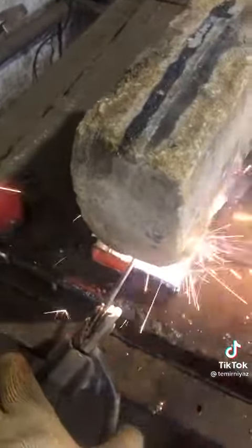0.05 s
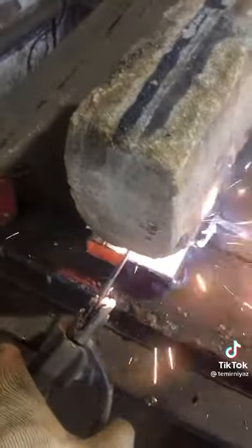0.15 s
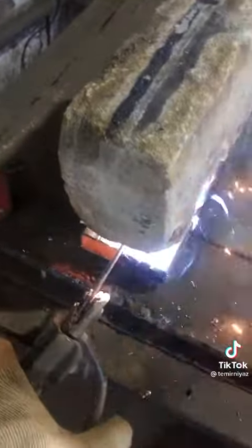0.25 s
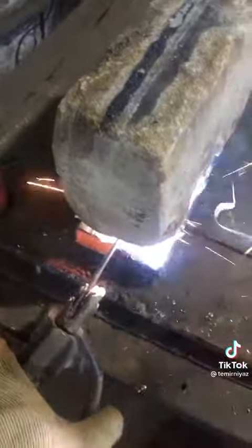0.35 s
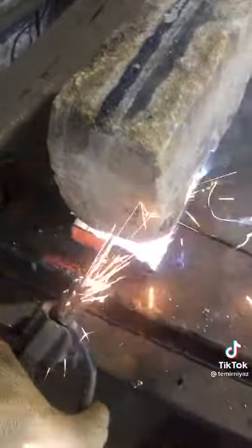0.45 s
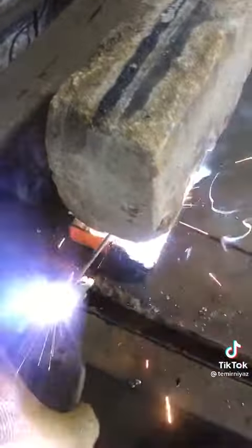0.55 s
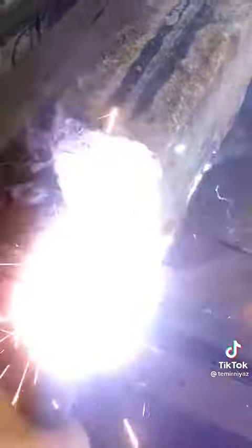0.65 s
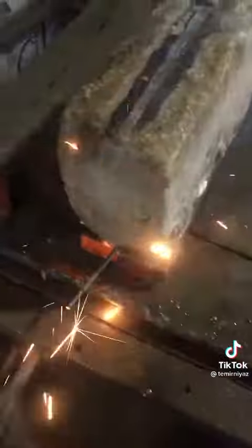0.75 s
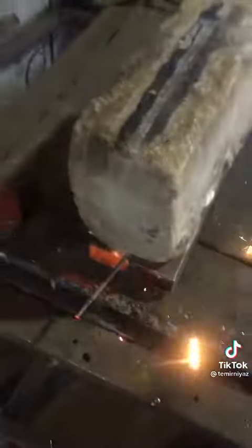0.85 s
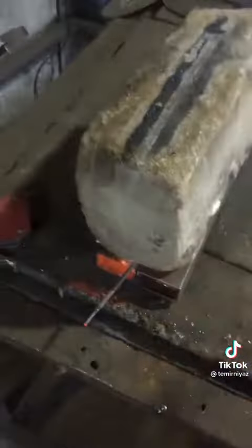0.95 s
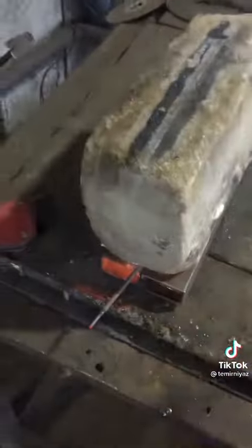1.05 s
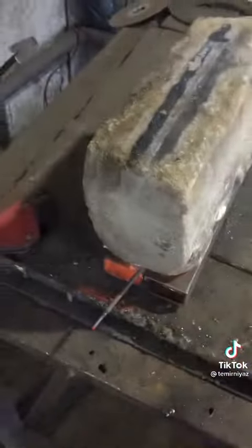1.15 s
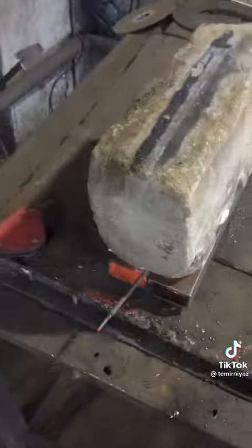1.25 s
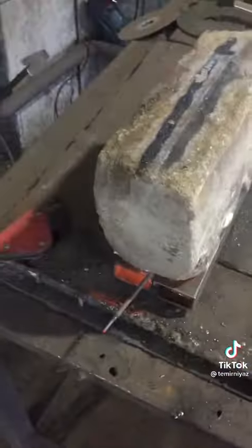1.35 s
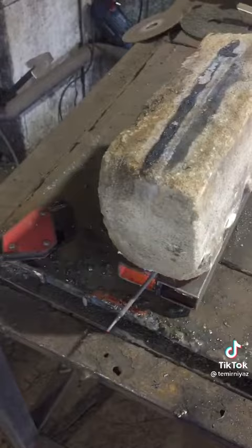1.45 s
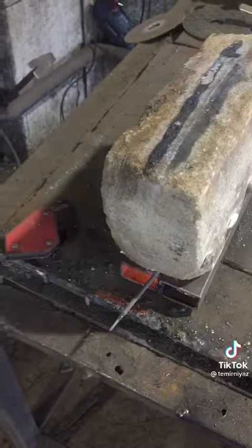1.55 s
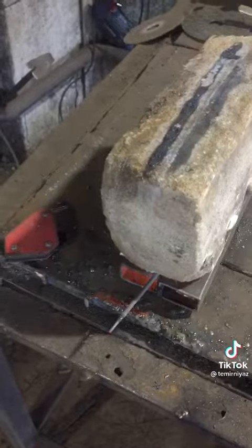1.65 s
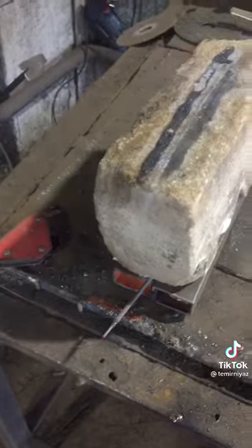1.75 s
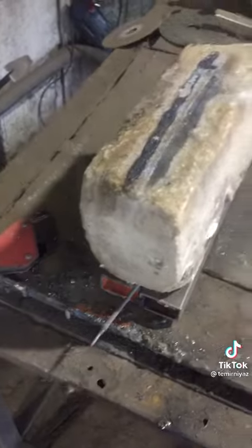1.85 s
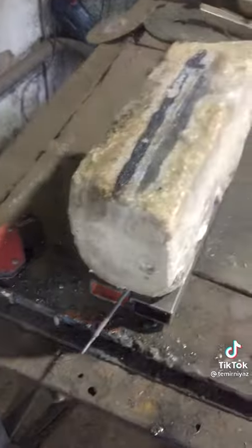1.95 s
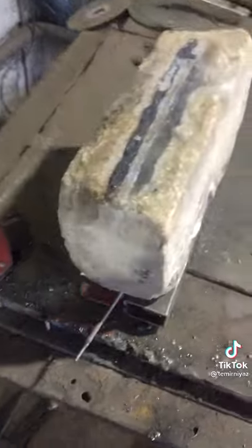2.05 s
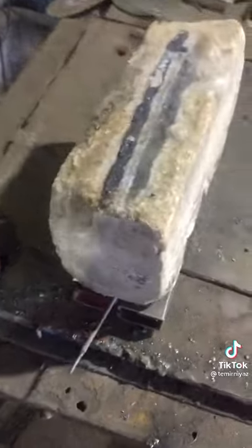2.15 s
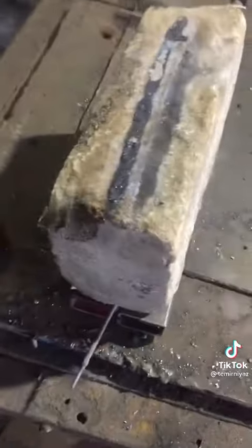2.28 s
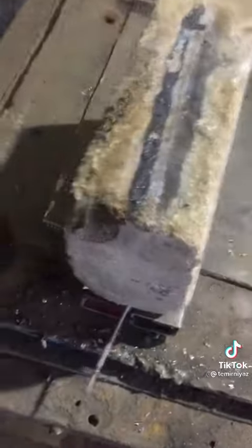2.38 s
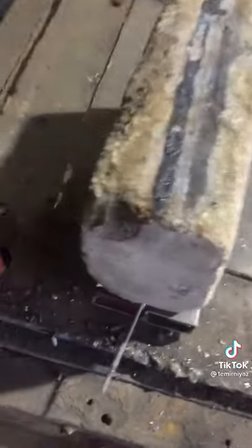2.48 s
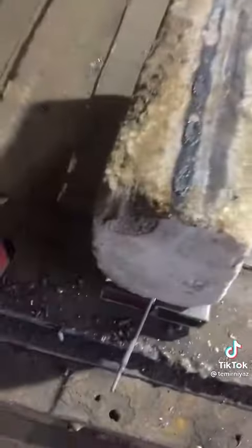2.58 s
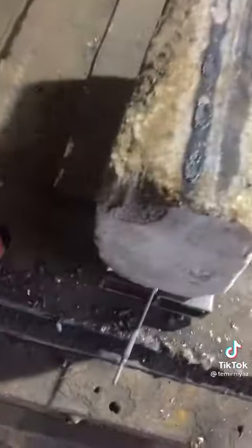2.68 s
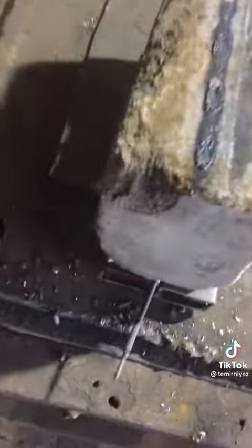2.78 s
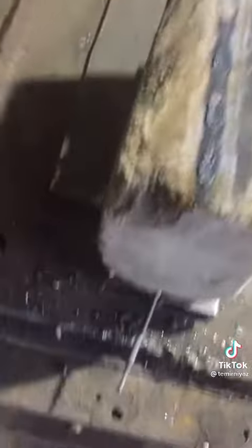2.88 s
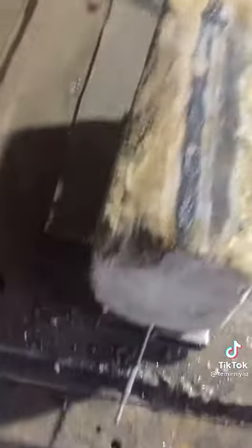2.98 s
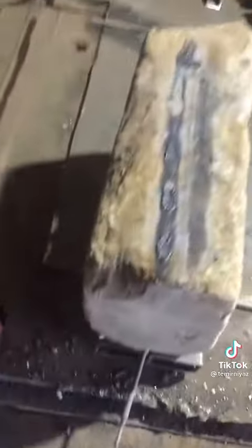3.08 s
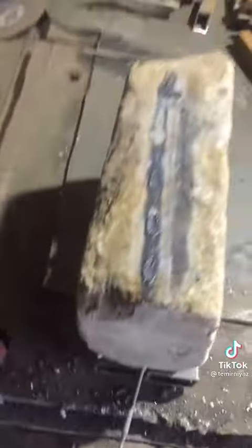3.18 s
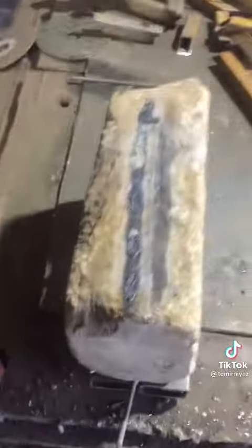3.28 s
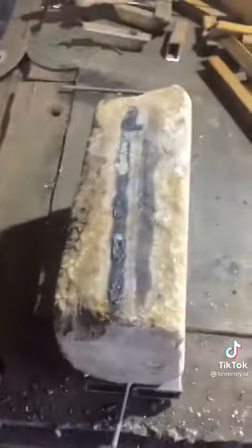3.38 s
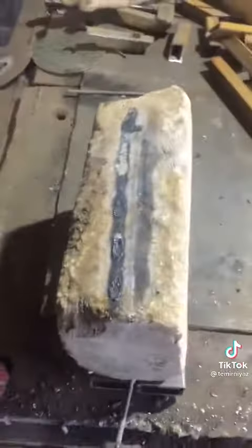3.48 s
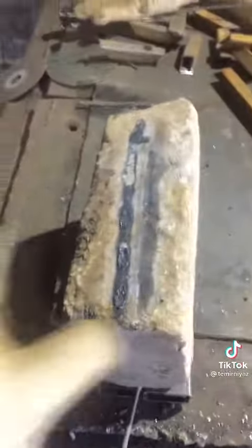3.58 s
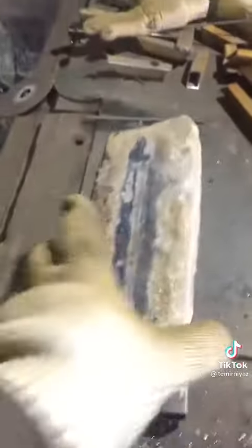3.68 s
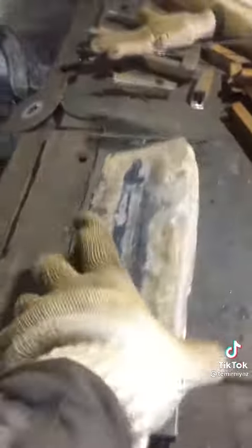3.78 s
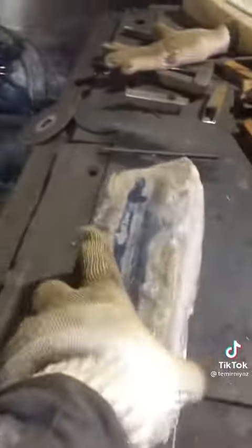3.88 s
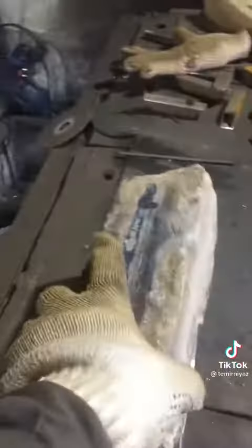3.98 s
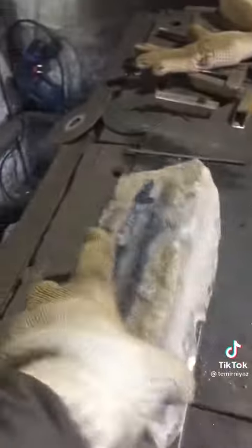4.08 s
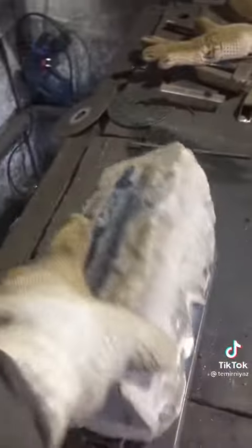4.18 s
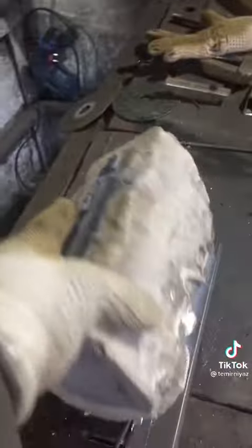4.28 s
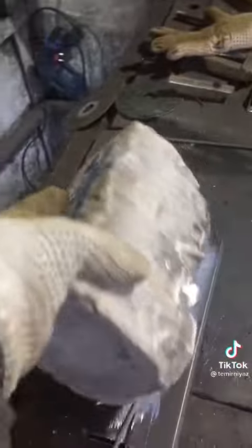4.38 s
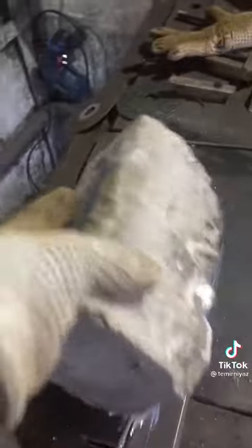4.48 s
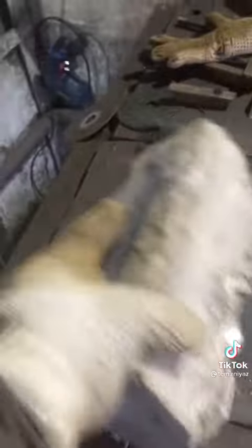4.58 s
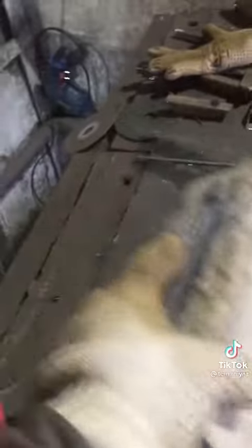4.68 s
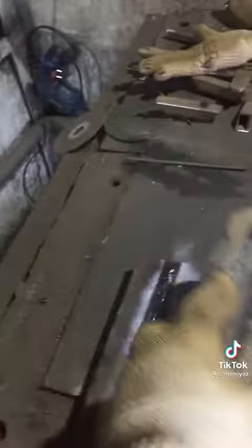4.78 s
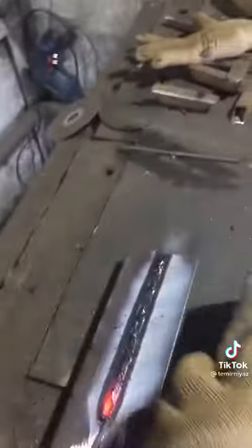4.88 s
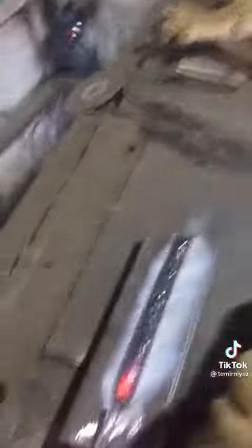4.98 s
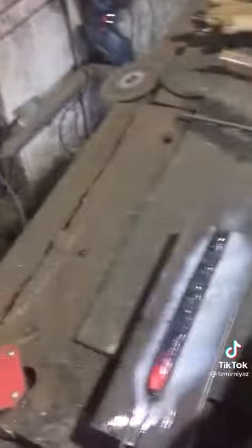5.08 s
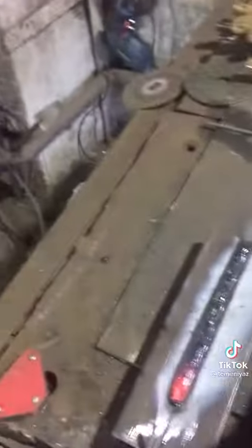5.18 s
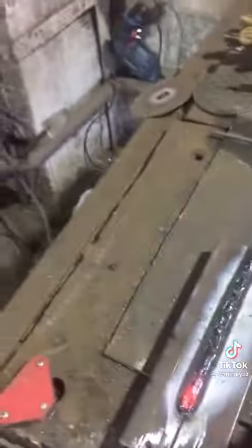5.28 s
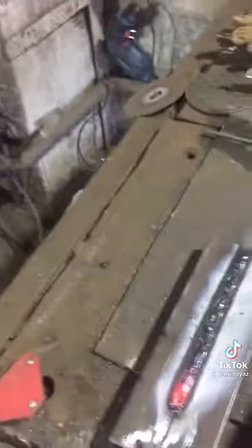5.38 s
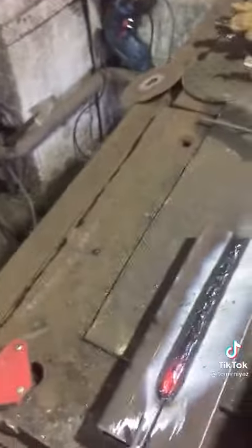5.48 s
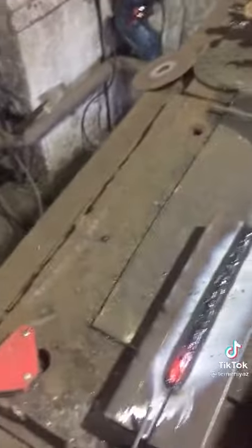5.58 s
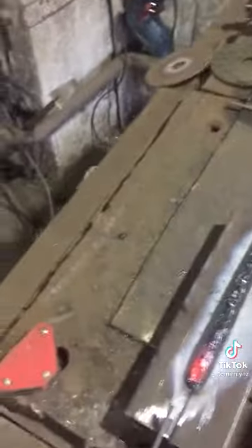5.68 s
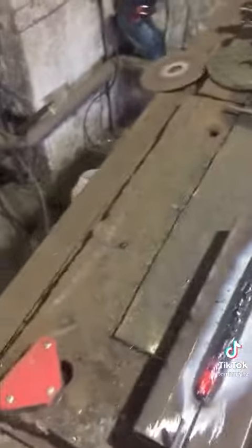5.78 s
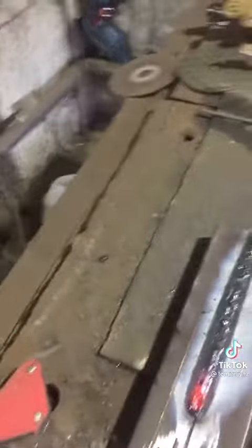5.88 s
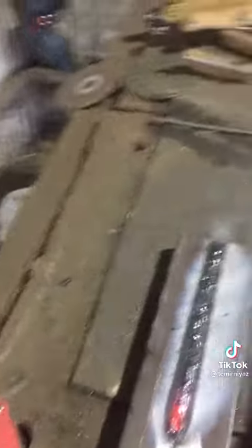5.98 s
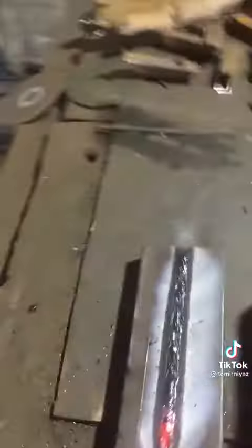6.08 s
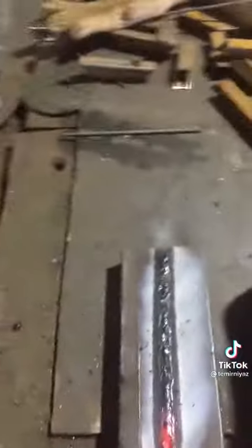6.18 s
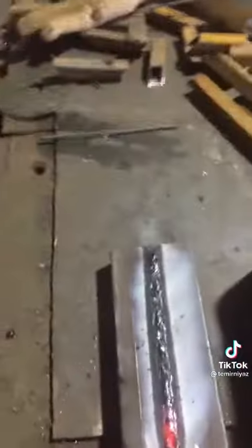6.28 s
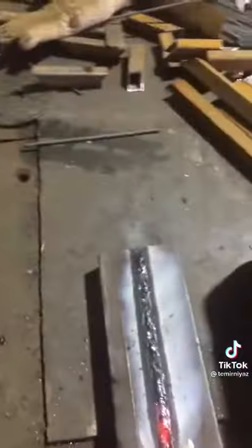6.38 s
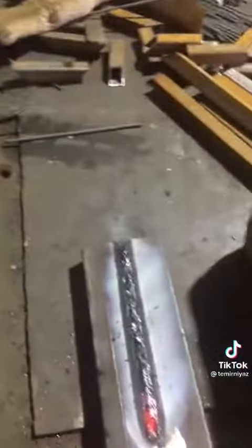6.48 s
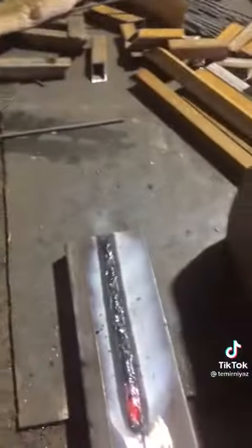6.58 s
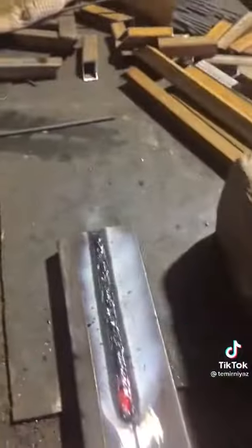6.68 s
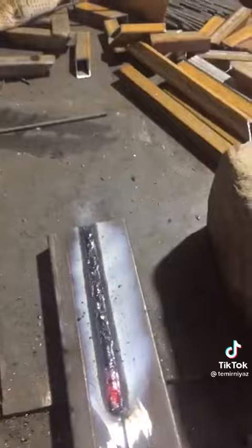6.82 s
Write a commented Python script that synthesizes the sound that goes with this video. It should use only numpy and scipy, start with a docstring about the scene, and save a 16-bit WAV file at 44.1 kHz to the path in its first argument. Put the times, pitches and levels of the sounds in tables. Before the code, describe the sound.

A handheld microphone near a steel workbench catches the loud, bright, crackling end of a weld, which flares and stops. Thin sizzling and brittle ticking fade over the next second, with two metallic knocks. Behind them a machine fan whines evenly over workshop rumble. Sharp clatter comes midway, then gloved scuffing, a loud low thud with metal rattle and short room echo, and finally small clicks and one dull knock.

```python
"""A stick-welding arc hisses and spits under a block in a hard-walled workshop and goes out; the slag sizzles and ticks.
Holder and block are set down on a steel bench, a glove scuffs about, and the welder's fan whines over the shop's hum.
Arc, slag and glove are shaped noise and grains; spits, ticks and knocks are four-band noise bursts; the bench adds
ringing modes, noise dies through single resonances, the fan is a set of sine orders. A diffuse tail adds the walls."""
import sys
import numpy as np
from scipy import signal
from scipy.fft import rfft, irfft
from scipy.io import wavfile
from scipy.ndimage import uniform_filter1d

SR = 44100
rng = np.random.default_rng(int(sys.argv[2]) if len(sys.argv) > 2 else 0)


def log_audio(samples):
    """Write samples as a 16-bit WAV file to the path given in sys.argv[1]."""
    # one column per channel
    frames = np.atleast_2d(samples).T
    # limit to full scale, then quantise
    limited = np.clip(frames, -1, 1)
    pcm = np.round(limited * 32767).astype(np.int16)
    wavfile.write(sys.argv[1], SR, pcm)


N = 302084
T = np.arange(N) / SR
HZ = np.maximum(np.fft.rfftfreq(N, 1 / SR), 1)
BURST_N = 8192  # samples in one blow or rattle


def undb(db):
    """Amplitude gain from dB."""
    return 10 ** (np.asarray(db) / 20)


def unit(x):
    """Scale to RMS 1."""
    return x / np.sqrt(np.mean(x ** 2))


def colour(x, points):
    """Shape the spectrum by (f/Hz, gain/dB) points, joined on a log-frequency axis."""
    f_hz, gain_db = np.transpose(points)
    gain = undb(np.interp(np.log(HZ), np.log(f_hz), gain_db))
    return irfft(rfft(x) * gain, N)


def curve(t_s, level_db):
    """Gain from a dB curve, silent outside it."""
    return undb(np.interp(T, t_s, level_db, left=-200, right=-200))


def band(x, lo_hz, hi_hz):
    """Butterworth band-pass."""
    return signal.sosfilt(signal.butter(2, [lo_hz, hi_hz], "bandpass", fs=SR, output="sos"), x)


def resonate(x, peaks):
    """Sum of (f/Hz, width/Hz, level/dB) resonances."""
    return sum(undb(db) * signal.lfilter(*signal.iirpeak(hz, hz / width, SR), x) for hz, width, db in peaks)


def ring(x, modes):
    """Sum of (f/Hz, level/dB, t60/s) decaying modes, each a one-pole complex resonator."""
    out = 0
    for f_hz, level_db, t60_s in modes:
        pole = np.exp(2j * np.pi * f_hz / SR - np.log(1000) / (t60_s * SR))
        out = out + undb(level_db) * signal.lfilter([1], [1, -pole], x).imag
    return out


def walk(rate_hz):
    """Random levels held 1 / rate_hz s, smoothed twice over that span, RMS 1."""
    hold = int(SR / rate_hz)
    steps = np.repeat(rng.standard_normal(N // hold + 1), hold)
    return unit(uniform_filter1d(uniform_filter1d(steps, hold), hold)[:N])


def grains(rate_hz, spread_db):
    """Sparse random clicks of either sign, few of them large, RMS 1."""
    chance = rng.random(N)
    size = np.minimum(rng.exponential(size=N), 4)
    sign = rng.choice([-1, 1], N)
    return unit((chance < rate_hz / SR) * sign * undb(spread_db * size))


def scattered(start_s, stop_s, level_db, spread_db, count):
    """Random moments and levels from level_db up, few of them strong."""
    u = rng.random((count, 2)).T
    return start_s + (stop_s - start_s) * u[0], level_db - spread_db * np.log(1 - u[1])


def swell(centre_s, length_s):
    """Raised-cosine hump."""
    out = np.zeros(N)
    near = slice(max(int((centre_s - length_s / 2) * SR), 0), int((centre_s + length_s / 2) * SR))
    out[near] = np.cos(np.pi * (T[near] - centre_s) / length_s) ** 2
    return out


def blows(t_s, level_db, tone_db, t60_s, scatter_db, snap):
    """Each blow is a snap and a dying burst of noise in four bands; the bass lasts longer, the treble shorter.

    tone_db: under 800 Hz, 800-3000 Hz, over 8 kHz, against 3-8 kHz; t60_s holds for 3-8 kHz."""
    edges_hz = [(70, 800), (800, 3000), (3000, 8000), (8000, 16500)]
    lasting = np.array([[1.8], [1.2], [1.0], [.7]])  # t60 ratio per band
    drive, t = np.zeros((4, N + BURST_N)), T[:BURST_N]
    tone_db = np.insert(np.broadcast_to(tone_db, (len(t_s), 3)), 2, 0, axis=1)
    for at_s, blow_db, own_db, long_s in zip(t_s, level_db, tone_db, np.broadcast_to(t60_s, len(t_s))):
        long_s = max(long_s, .002)
        decay = 1000. ** (-t / (lasting * long_s))
        attack = 1 - np.exp(-(t + 1 / SR) / (.02 * long_s))
        burst = rng.standard_normal(BURST_N) * decay * attack
        burst[:, 0] += snap
        gain = undb(blow_db + own_db + scatter_db * rng.standard_normal(4))
        start = int(at_s * SR)
        drive[:, start:start + BURST_N] += gain[:, None] * burst
    out = 0
    for k, (lo_hz, hi_hz) in enumerate(edges_hz):
        equal_power = np.sqrt(5000 / (hi_hz - lo_hz))
        out = out + (-1) ** k * equal_power * band(drive[k, :N], lo_hz, hi_hz)  # sign keeps neighbours in phase
    return out


def arc():
    """Plasma hiss with fine crackle and bursting droplets rings the gap under the block; roar, flares and puffs add."""
    # burning arc, hiss: (t/s, level/dB)
    burn_curve = [(0.0, -21), (0.02, -26), (0.045, -29), (.25, -29.5), (.275, -33), (.29, -27), (.42, -27),
                  (.6, -29.5), (0.645, -30), (0.657, -23), (0.724, -23.5), (0.77, -32.5)]
    # hiss spectrum: (f/Hz, gain/dB)
    hiss_colour = [(35, -52), (60, -13), (308, -7.5), (480, -12.5), (621, -1), (2000, -3.5), (3270, 0),
                   (3940, -2.5), (4220, 0.5), (7750, -1), (9570, -1), (14600, -15.5), (16000, -6)]
    # air gap under the block: (f/Hz, width/Hz, level/dB)
    gap_peaks = [(2930, 110, -3.5), (3264, 60, 8), (4100, 67, -13)]
    # single bursting droplets: (t/s, level/dB)
    timed_spits = [(0.0014, -18), (0.0176, 0), (0.0425, -9), (0.0566, -6.5), (0.1554, -12), (0.1765, -14),
                   (0.187, -2), (0.2389, -8), (0.2515, -5.5), (0.2876, -18.5), (0.4061, -10), (0.43, -13.5),
                   (.498, -15), (0.517, -11.5), (0.534, -11), (0.6177, -14.5), (0.656, 0), (0.6631, -4.5),
                   (0.699, -18.5), (0.7073, -39), (0.7203, -20.5), (0.7383, -9.5)]
    # spit tone at 0 dB level: (under 800 Hz, 800-3000 Hz, over 8 kHz)/dB against 3-8 kHz
    spit_tone_db = (-8.5, -9, 0)
    # arc drawn long, hissing high: (start t/s, level/dB, length/s)
    flare_times = [(.53, -22, .013), (0.658, -22.5, 0.041), (0.702, -21.5, .058)]
    # flare resonances: (f/Hz, width/Hz, level/dB)
    flare_peaks = [(12150, 3100, 3.5), (14600, 1900, -9.5)]
    # gas pushed out as the arc flares or dies: (start t/s, level/dB before the band-pass, length/s)
    puff_times = [(.018, -14, 0.0043), (0.662, -20, 0.0028), (0.694, -25, 0.0035), (0.755, -20, 0.0048)]
    bass_db_per_db = 3  # the bigger the droplet, the fuller its burst
    roar_db, roar_waver_db = -18.5, 2.5  # against the hiss
    flare_edge_s, flare_flicker_db = .006, 2

    burning = curve(*np.transpose(burn_curve))
    flutter = undb(2.2 * walk(110))
    plasma = flutter * (rng.standard_normal(N) + 1.1 * grains(600, spread_db=3))

    random_spits = scattered(0, burn_curve[-2][0], -26.5, spread_db=2.5, count=45)
    t_s, level_db = np.hstack([np.transpose(timed_spits), random_spits])
    tone_db = spit_tone_db + bass_db_per_db * np.outer(level_db, [1, .5, 0])
    spits = blows(t_s, level_db, tone_db, t60_s=.0055, scatter_db=1.0, snap=3.56)
    hiss = burning * unit(colour(plasma, hiss_colour)) + spits

    roar_gain = burning * undb(roar_db + roar_waver_db * walk(15))
    roar = roar_gain * unit(band(rng.standard_normal(N), 92.6, 1100))

    drawn = 0
    for start_s, flare_db, length_s in flare_times:
        edge = np.minimum(T - start_s, start_s + length_s - T) / flare_edge_s
        drawn = drawn + undb(flare_db) * np.clip(edge, 0, 1)
    flicker = undb(flare_flicker_db * walk(45))
    flares = drawn * flicker * unit(resonate(resonate(plasma, flare_peaks), flare_peaks))

    pushes = sum(undb(db) * swell(start_s + length_s / 2, length_s) for start_s, db, length_s in puff_times)
    puffs = band(pushes, 50, 900)
    return hiss + undb(1.0) * resonate(hiss, gap_peaks) + roar + flares + puffs


def fan():
    """Sine orders of the blade rate, which drifts slightly; each order wavers alone."""
    # orders 4 and 5 as the listener moves about: (t/s, 4th level/dB, 5th level/dB)
    moving_orders = [(.8, -55, -56), (1.3, -47.5, -67), (1.5, -45, -66), (1.9, -43.5, -55.5),
                     (2.4, -47.5, -56), (2.8, -43.5, -53), (3.1, -47, -52), (3.5, -44.5, -57),
                     (4.1, -42.5, -55.5), (4.5, -51, -51), (4.85, -56, -49.5), (5.4, -44.5, -60),
                     (5.8, -44.5, -57.5), (6.1, -52, -57), (6.45, -43.5, -66), (6.85, -48.5, -67)]
    # steady orders: (order, level/dB)
    steady_orders = [(2, -59), (3, -60.5), (6, -55), (7, -63), (9, -70.5), (11, -71.5), (12, -73.5)]
    # first order, stronger nearer the fan: (t/s, level/dB)
    first_order = [(0, -72), (1.9, -59), (3.5, -52.5), (6.85, -49)]
    blade_hz = 473.7

    t_s, fourth_db, fifth_db = np.transpose(moving_orders)
    phase = 2 * np.pi * np.cumsum(blade_hz * (1 + .0008 * walk(2))) / SR
    gains = [(1, curve(*np.transpose(first_order)))]
    gains += [(4, undb(np.interp(T, t_s, fourth_db))), (5, undb(np.interp(T, t_s, fifth_db)))]
    gains += [(order, undb(db)) for order, db in steady_orders]
    out = 0
    for order, gain in gains:
        waver = undb(1.4 * walk(8))
        tone = np.sqrt(2) * np.sin(order * phase + 2 * np.pi * rng.random())  # RMS 1
        out = out + gain * waver * tone
    return out


def shop():
    """Fan air and far machines: steady noise with humps that swell alone, over a rumble that comes and goes."""
    # air spectrum: (f/Hz, gain/dB)
    air_colour = [(26, -45.5), (45, 0.5), (215, -6), (279, -6), (405, -0.5), (477, -12), (631, -8),
                  (918, -10), (1430, -9.5), (1680, -11.5), (1940, -6), (2080, -9.5), (2880, -12),
                  (3560, -17), (12000, -40.5), (15600, -75.5), (22000, -120)]
    # swelling humps: (f/Hz, width/Hz, level/dB)
    hum_peaks = [(146.5, 10, 5), (205, 7.3, -3), (271.5, 9.4, 3), (295, 14, -0.5), (348, 7.9, -17),
                 (458.9, 1.6, -1.5), (490, 19, -1), (823.6, 10, -5), (901, 17.6, -1), (1324, 14, -5),
                 (1557, 37, -3)]
    # far machines: (t/s, level/dB)
    rumble_curve = [(0, -53), (.8, -60.5), (2.6, -55.5), (4.3, -49), (5.1, -39.5), (5.74, -43.5),
                    (6.3, -47), (6.85, -45)]
    air_db = -45.5

    air = unit(colour(rng.standard_normal(N), air_colour)) * undb(.7 * walk(3))
    humps = 0
    for peak in hum_peaks:
        swelling = undb(3.2 * walk(7.3))
        humps = humps + swelling * resonate(rng.standard_normal(N), [peak]) / np.sqrt(peak[1])
    rumble_gain = curve(*np.transpose(rumble_curve)) * undb(2.5 * walk(3))
    rumble = rumble_gain * unit(band(rng.standard_normal(N), 45, 140))
    return undb(air_db) * (air + undb(1.0) * unit(humps)) + rumble


def slag():
    """Dense fine grains and many small bright ticks while it cools, then lone duller ticks as it cracks or grit drops."""
    # cooling slag: (t/s, level/dB)
    sizzle_curve = [(0.76, -51), (1.0, -38.5), (1.4, -42.5), (1.646, -42), (1.878, -45.5), (2.0, -72)]
    # sizzle spectrum: (f/Hz, gain/dB)
    sizzle_colour = [(880, -1), (1500, -2), (1740, -13), (1830, -10), (2080, -6), (3280, -4), (7760, -9),
                     (14800, -7.5), (16000, -2)]
    # single ticks of slag and grit: (t/s, level/dB)
    timed_ticks = [(0.959, -29.5), (1.1418, -21.5), (1.2553, -24), (1.287, -28), (1.5704, -31),
                   (1.6634, -28.5), (1.738, -34), (1.769, -35.5), (1.8143, -49), (2.5606, -44),
                   (2.953, -36.5), (3.0051, -33), (3.712, -36.5), (3.888, -38), (3.9831, -33), (4.091, -29),
                   (4.222, -31.5), (4.2496, -31), (4.265, -28), (4.3413, -46), (4.378, -31.5), (4.783, -44),
                   (5.3266, -30.5), (5.421, -36.5), (5.6824, -43), (5.7113, -41), (5.9684, -48),
                   (6.0053, -54), (6.0996, -48), (6.1894, -49), (6.2563, -46.5), (6.4054, -42),
                   (6.4437, -39), (6.5052, -37), (6.549, -29)]
    # tick tone, hot and cooled: (under 800 Hz, 800-3000 Hz, over 8 kHz)/dB against 3-8 kHz
    hot_tone_db = (-25, -10, 7.8)
    cool_tone_db = (-33, -17.5, -2.2)
    # thin high ringing of the ticks: (f/Hz, level/dB, t60/s)
    tick_modes = [(4520, -2.5, 0.071), (4855, -3.5, .06), (5540, 3.5, .06), (6460, -7, 0.075),
                  (9130, -6, 0.1), (11300, -2, 0.076), (12900, 2, 0.068), (14200, -2, .06)]
    cooled_s, hot_t60_s, cool_t60_s = 1.92, .0085, .032

    fizz = rng.standard_normal(N) + .6 * grains(500, spread_db=2.5)
    sizzle = curve(*np.transpose(sizzle_curve)) * unit(colour(fizz, sizzle_colour))
    random_ticks = scattered(1.2, cooled_s, -44.5, spread_db=3, count=36)
    t_s, level_db = np.hstack([np.transpose(timed_ticks), random_ticks])
    hot = t_s < cooled_s
    tone_db = np.where(hot[:, None], hot_tone_db, cool_tone_db)
    ticks = blows(t_s, level_db, tone_db, np.where(hot, hot_t60_s, cool_t60_s), scatter_db=3.5, snap=1.1)
    ringing = undb(-34) * ring(ticks * (T > cooled_s), tick_modes)
    return sizzle + ticks + ringing


def bench():
    """Contact noise of the knocks, built from overlapping bursts, excites the modes of the steel top."""
    # bursts making up the knocks on the bench, strikes, bodies and dying tails: (t/s, 3-8 kHz level/dB,
    # then against it under 800 Hz/dB, 800-3000 Hz/dB, over 8 kHz/dB, 3-8 kHz t60/s)
    knock_bursts = [(1.150, -18.5, -16.5, -13, 2, 0.03), (1.169, -31.5, -10, 14, 16, 0.015),
                    (1.393, -11.5, -9, -6, -3.5, 0.016), (1.4, -11.5, -34.5, -24, -13, 0.031),
                    (1.424, -27, -28.5, -8, 3.5, 0.18), (1.409, -26, -20, -14, -12, 0.52),
                    (3.2035, -8, -24, 5, 1, 0.0057), (3.2052, -3, -22, 3, -5, 0.0084),
                    (3.209, -16, -18, 4, -6, 0.018), (3.215, -20.5, -15, 3, -4, 0.023),
                    (3.347, -23, -33, -18, 3, .02), (3.361, -15.5, -36, -3.5, -18, .018),
                    (3.4079, -14.5, -38, -1.5, 4.5, 0.022), (3.925, -29.5, -8, -3, -8.5, .05),
                    (4.906, -6, 0, 7, -5, 0.051), (4.913, -3, -11, 1, -13, 0.077),
                    (4.922, -6.5, -20.5, 5.5, -8, 0.1), (4.950, -17, 0.5, -21, -2, 0.17),
                    (5.008, -15, -4, 2.5, -5, 0.14), (5.036, -10, -10.5, -7, -11, 0.098),
                    (5.070, -32, 10.5, -11, 5, 0.094), (5.114, -21.5, -8, -24, -13, 0.28),
                    (5.205, -19, -5.5, -19, -8.5, 0.064), (5.258, -26.5, -0.5, 2, -8, 0.1),
                    (6.8445, -14.5, -24, -2, -13.5, 0.032)]
    # steel top: (f/Hz, level/dB, t60/s)
    top_modes = [(107.9, -6, 0.67), (143, -5, 0.4), (220.6, 1.5, 0.28), (1878, -5, 0.37), (1970, 0, 0.09),
                 (2510, -8.5, 0.06), (4060, -23, .06), (4860, -16, 0.044)]
    t_s, level_db, *tone_db, t60_s = np.transpose(knock_bursts)
    contact = blows(t_s, level_db, np.transpose(tone_db), t60_s, scatter_db=0, snap=3.4)
    return contact + undb(-49.0) * ring(contact, top_modes)


def dying_resonances():
    """Dying resonances of knocks, ticks and scuffs: metallic rattles and one low thud, each noise through one peak."""
    # resonances: (t/s, level/dB, f/Hz, t60/s)
    resonance_times = [(1.152, -16, 1980, 0.016), (1.16, -22.5, 2480, 0.018), (1.395, -26, 9470, 0.12),
                       (1.41, -40, 5560, .13), (3.204, -6.5, 8330, 0.017), (3.205, -10.5, 1640, 0.016),
                       (3.204, -11, 6400, .012), (3.408, -24.5, 3500, 0.028), (3.924, -31.5, 4760, 0.06),
                       (3.986, -43, 4600, 0.037), (4.265, -30, 4170, .04), (4.265, -40, 9280, 0.049),
                       (4.908, -15.5, 193, 0.2), (4.95, -19.5, 4500, 0.47), (5.012, -24, 4030, .044),
                       (5.118, -22.5, 4440, 0.077), (5.206, -22, 2320, 0.0472), (5.207, -31, 4485, 0.081),
                       (6.445, -45, 4470, .04), (6.51, -33.5, 2250, 0.15), (6.551, -37, 2486, 0.36)]
    out, t = np.zeros(N + BURST_N), T[:BURST_N]
    noises = rng.standard_normal((len(resonance_times), BURST_N))
    for (t_s, level_db, f_hz, t60_s), noise in zip(resonance_times, noises):
        width_hz = min(310, f_hz / 2)
        dying = noise * 1000. ** (-t / max(t60_s, .005))
        peak = resonate(dying, [(f_hz, width_hz, level_db)])
        start = int(t_s * SR)
        out[start:start + BURST_N] += peak * np.sqrt(SR / 4 / width_hz)  # offsets the narrow band's loss
    return out[:N]


def glove():
    """Short grainy scuffs of cloth on stone and steel: noise and grains in a fine and a coarse band."""
    # glove and grit scuffing: (centre t/s, fine-band level/dB, length/s)
    scuff_times = [(2.332, -55, 0.11), (2.448, -59, .033), (2.56, -51.5, 0.049), (3.018, -45, 0.036),
                   (3.365, -34.5, 0.014), (3.595, -52.5, 0.07), (3.719, -52.5, 0.19), (3.909, -45.5, 0.065),
                   (3.933, -33, 0.036), (3.99, -52, .05), (4.091, -42.5, 0.072), (4.268, -45.5, .023),
                   (4.823, -58.5, .19), (5.002, -34, 0.25), (5.31, -46.5, 0.13), (5.585, -54.5, 0.3),
                   (5.724, -51.5, 0.067), (5.971, -62, 0.053), (6.262, -56, .064), (6.552, -44.5, 0.2)]
    # slag crumbs under the glove: (f/Hz, width/Hz, level/dB)
    grit_peaks = [(4560, 68, 2), (5400, 250, 6), (8600, 250, 2), (11300, 200, 4)]
    coarse_db = 3  # against the fine band
    rub = rng.standard_normal(N) + .8 * grains(1200, spread_db=3)
    rub = rub + undb(-7.0) * resonate(rub, grit_peaks)
    fine = unit(band(rub, 4700, 15600))
    coarse = undb(coarse_db) * unit(band(rub, 1100, 6630))
    strokes = sum(undb(db) * swell(centre_s, length_s) for centre_s, db, length_s in scuff_times)
    return (fine + coarse) * strokes


def room(x):
    """Diffuse tail, each octave dying at its own rate."""
    # hard-walled workshop: (f/Hz, t60/s)
    decay_curve = [(100, 0.94), (260, 1), (700, 1), (1840, 1), (4850, 0.75), (12800, 0.24)]
    f_hz, t60_s = np.transpose(decay_curve)
    t = T[:SR]
    tail = 0
    for octave_hz in 88 * 2. ** np.arange(8):
        octave_t60_s = np.interp(np.log(octave_hz), np.log(f_hz), t60_s)
        noise = band(rng.standard_normal(SR), octave_hz / 2 ** .5, octave_hz * 2 ** .5)
        tail = tail + noise * 1000. ** (-t / octave_t60_s)
    tail = tail * (1 - np.exp(-t / 0.0048))  # the first walls answer after a few ms
    return signal.fftconvolve(x, tail / np.sqrt(np.sum(tail ** 2)))[:N]


def scene():
    """Direct sounds, their share of the room, and the fan and shop, which get no added tail."""
    weld, near, knocks, peaks = arc(), slag() + glove(), bench(), dying_resonances()
    walls = room(undb(-20) * weld + undb(-13.0) * near + undb(-10.5) * knocks + undb(-13) * peaks)
    return (weld + near + knocks + peaks + walls + fan() + shop())[None]


def record(dry):
    """Microphone colour and self-noise, soft overload, steep top cut."""
    # microphone response: (f/Hz, gain/dB)
    mic_colour = [(25, -33.5), (45, -2), (4400, -2), (4900, -3.5), (6500, -3), (8000, -8), (9400, -1.5),
                  (10400, -7.5), (11500, -3), (13300, -4.5), (14600, -1.5), (15300, -3), (15600, -20),
                  (16400, -25.5)]
    top_hz = 16494
    x = colour(dry[0] + undb(-75.0) * rng.standard_normal(N), mic_colour)
    overloaded = np.tanh(1.1 * x) / 1.1
    return signal.sosfilt(signal.ellip(10, .2, 80, top_hz, fs=SR, output="sos"), overloaded)[None]


dry = scene()
out = record(dry)
log_audio(out)
```